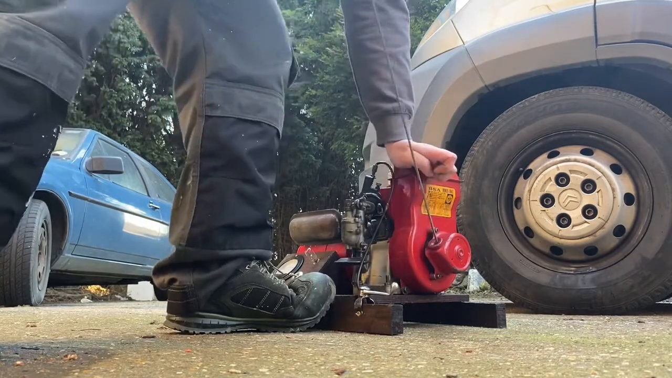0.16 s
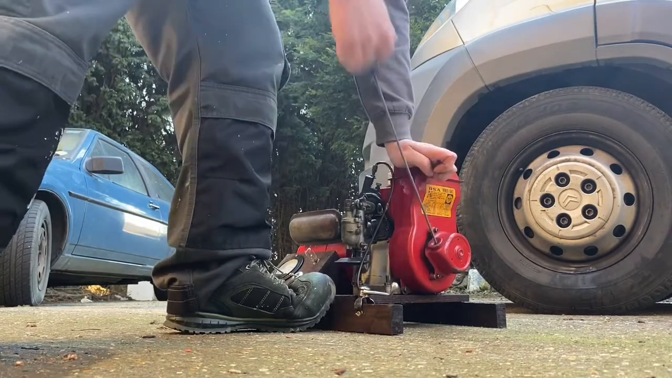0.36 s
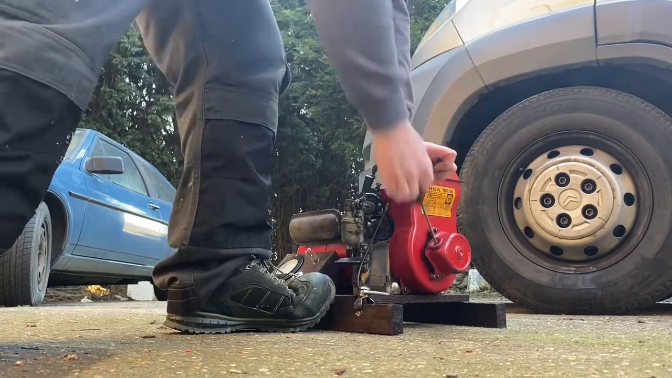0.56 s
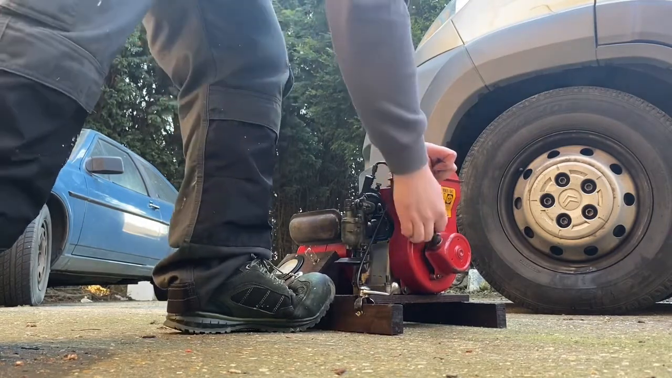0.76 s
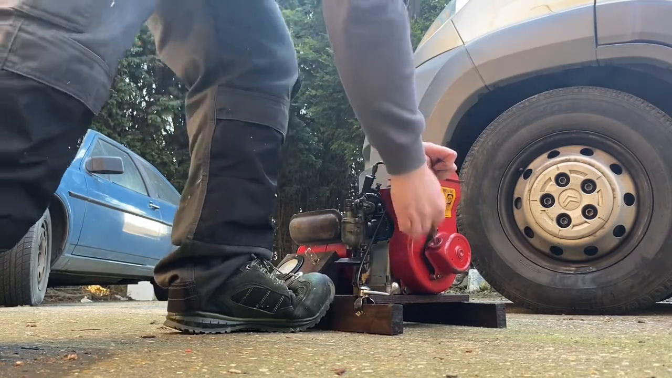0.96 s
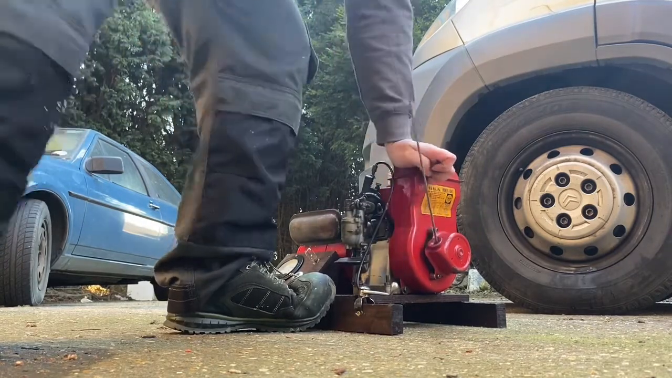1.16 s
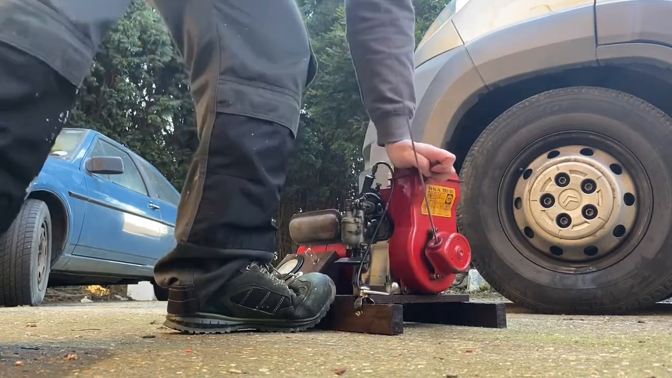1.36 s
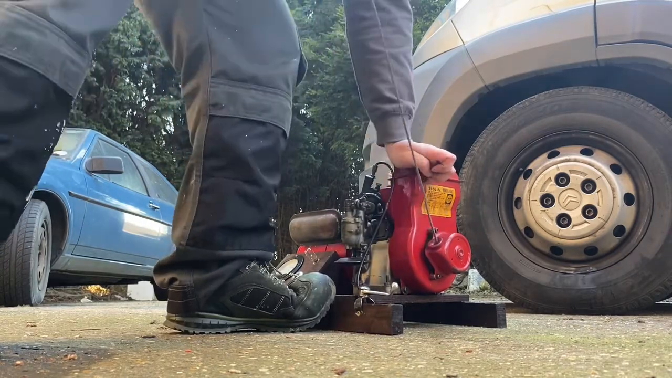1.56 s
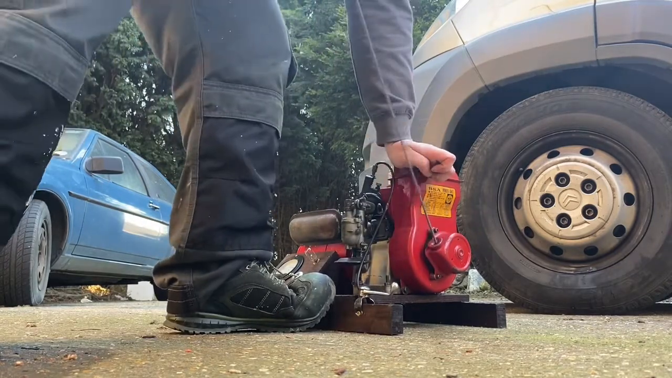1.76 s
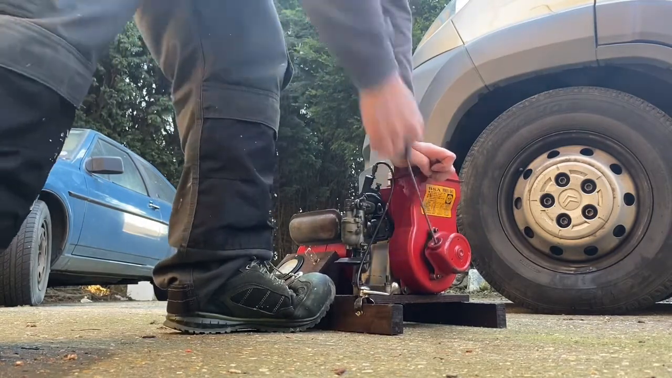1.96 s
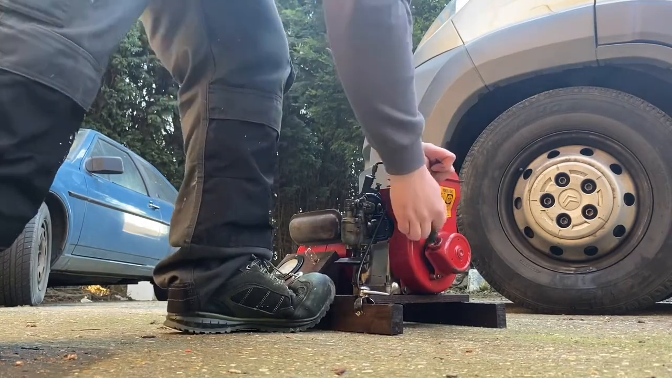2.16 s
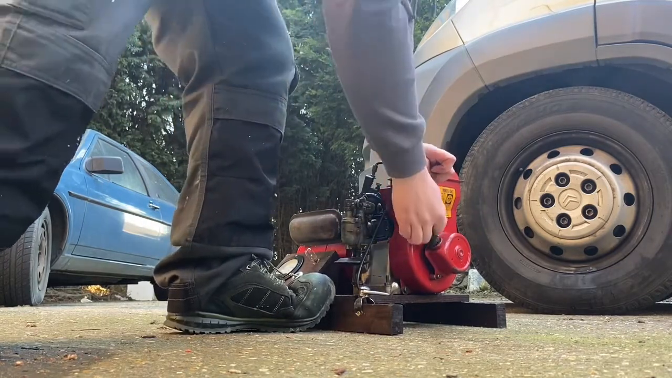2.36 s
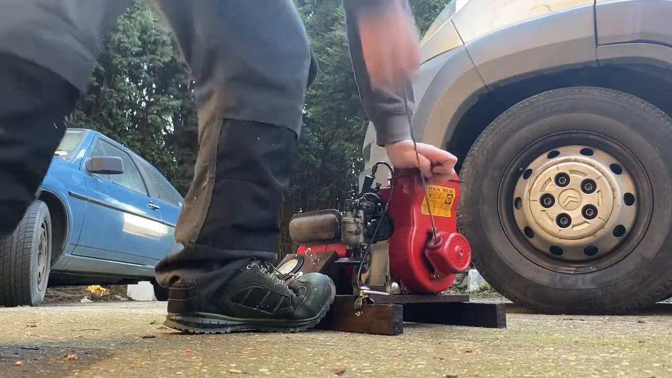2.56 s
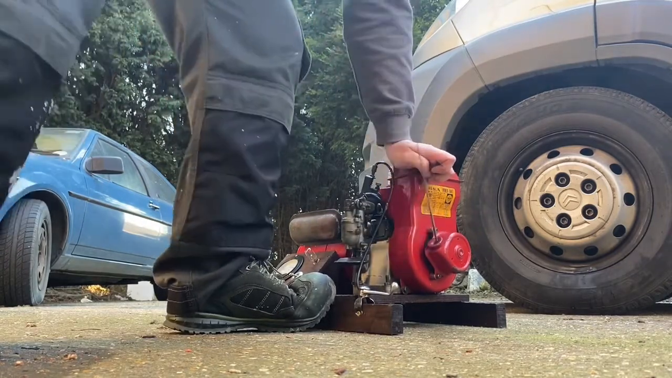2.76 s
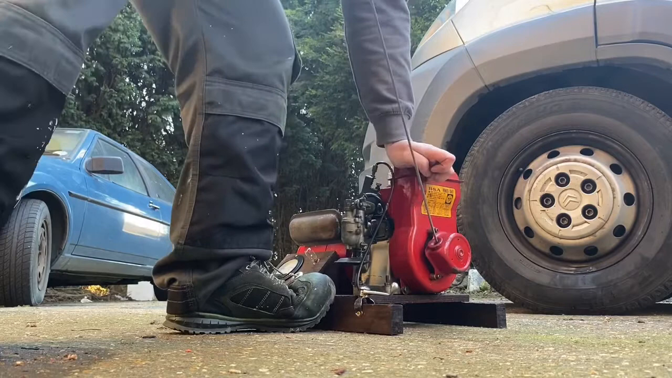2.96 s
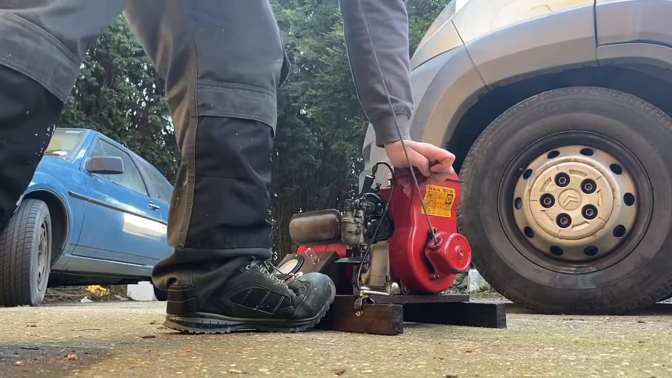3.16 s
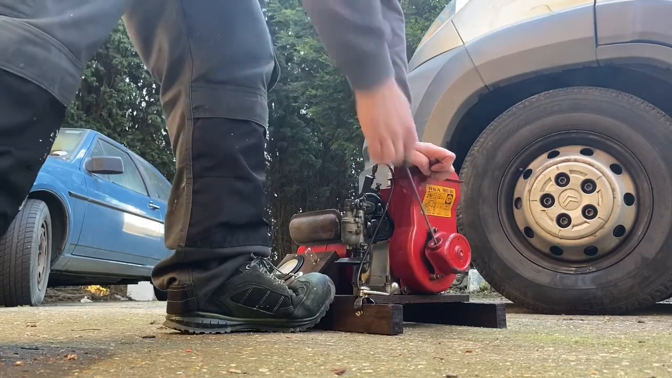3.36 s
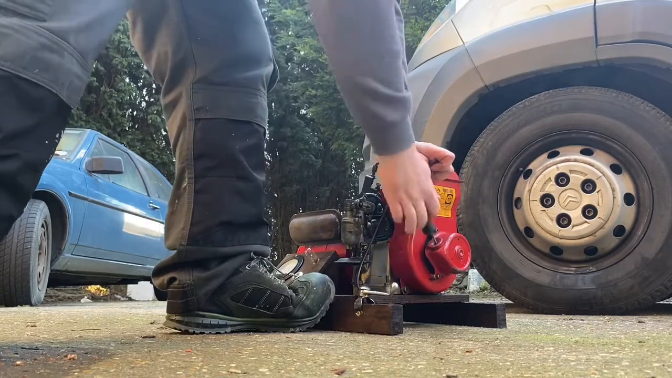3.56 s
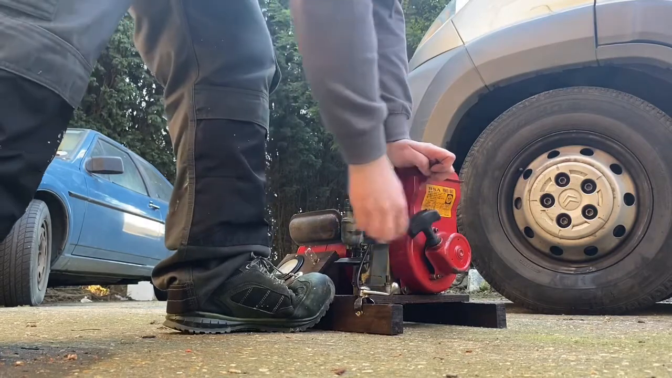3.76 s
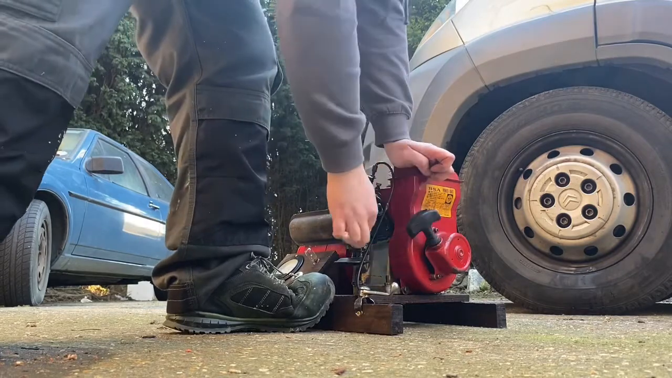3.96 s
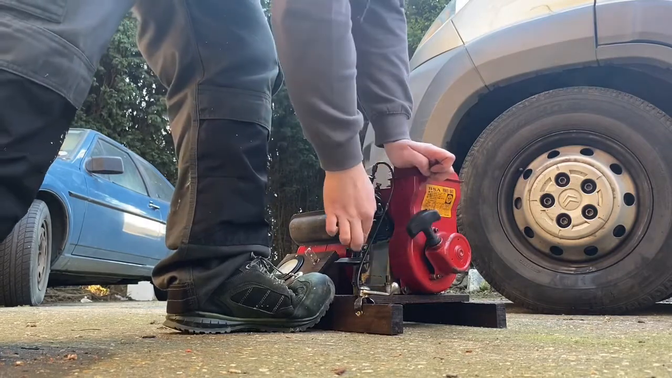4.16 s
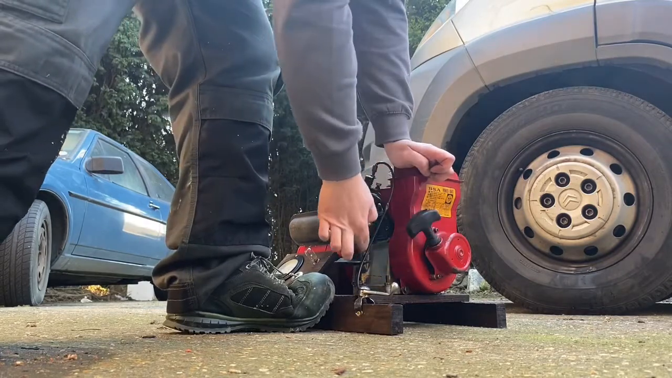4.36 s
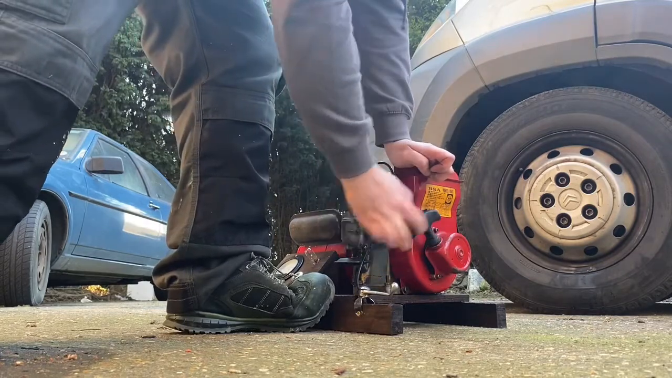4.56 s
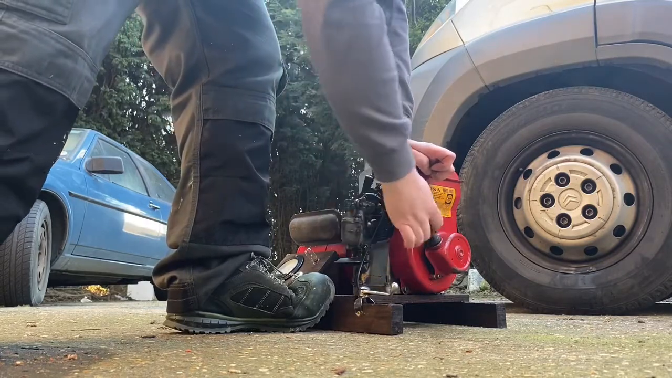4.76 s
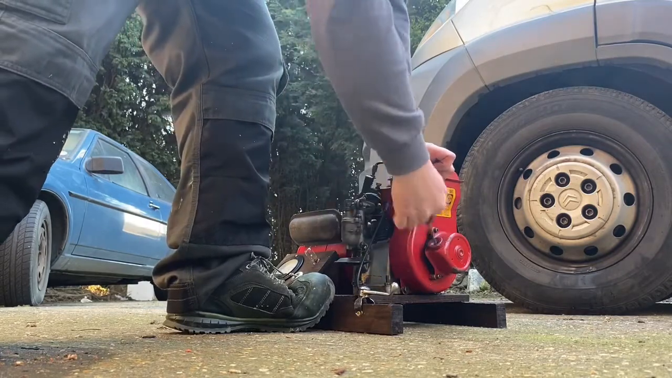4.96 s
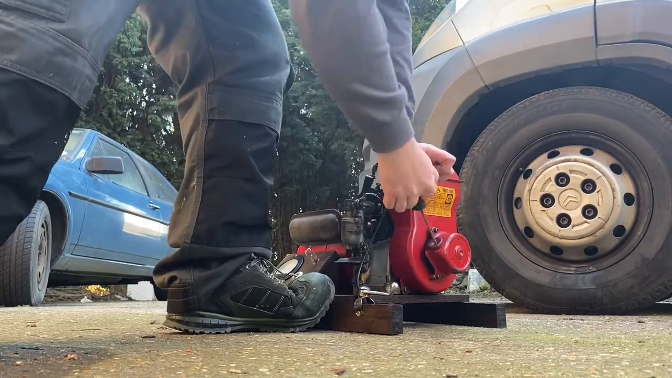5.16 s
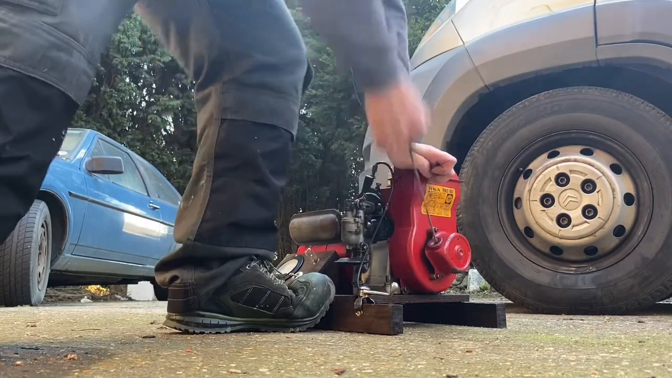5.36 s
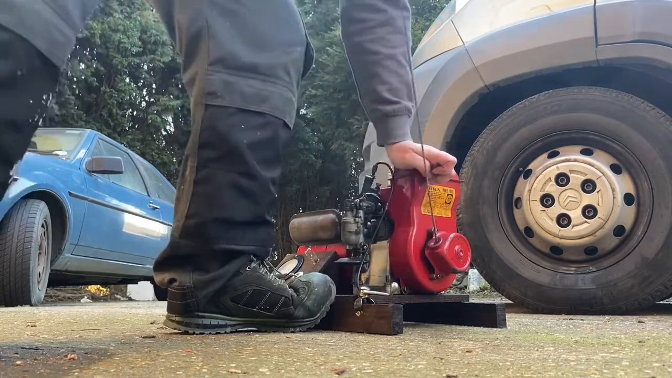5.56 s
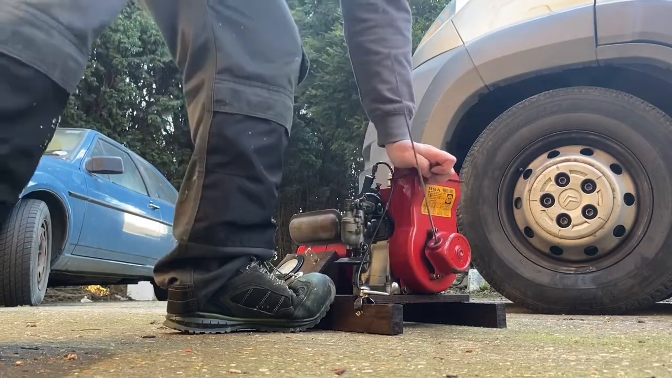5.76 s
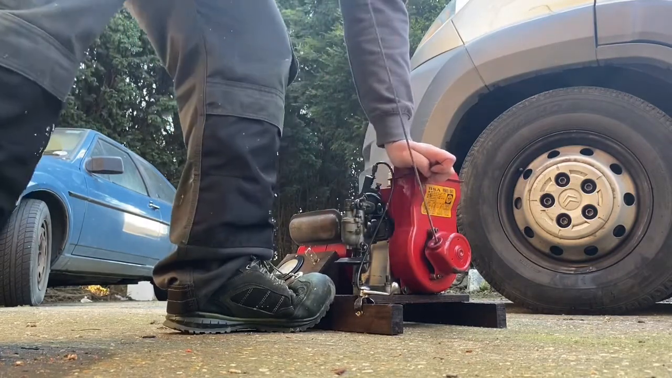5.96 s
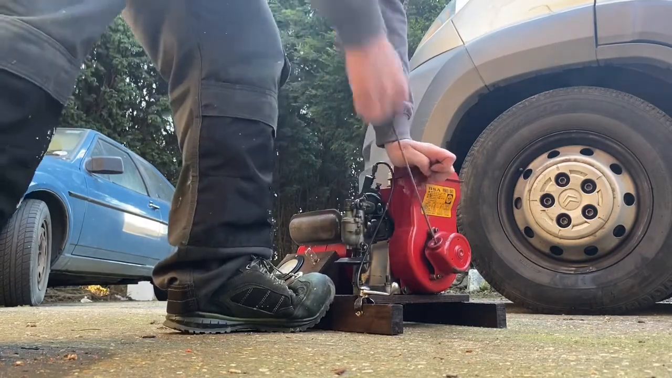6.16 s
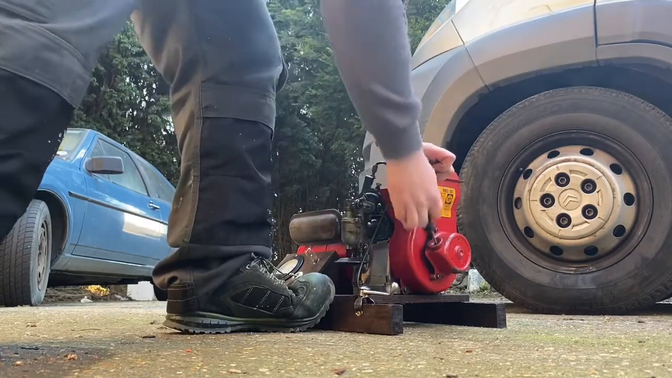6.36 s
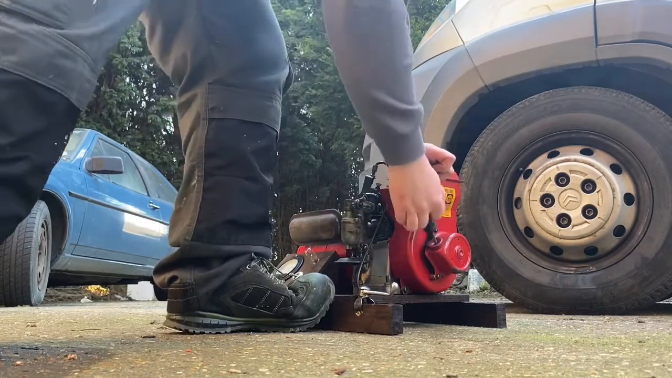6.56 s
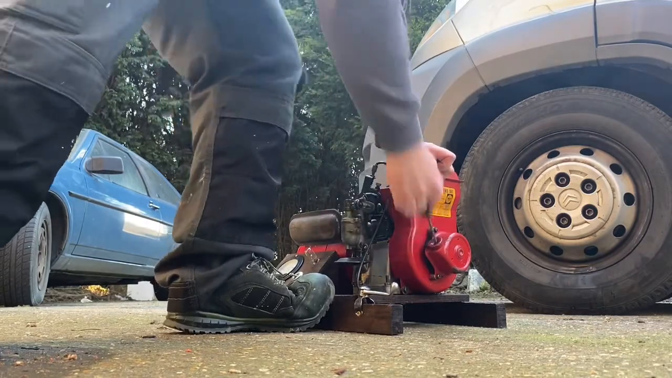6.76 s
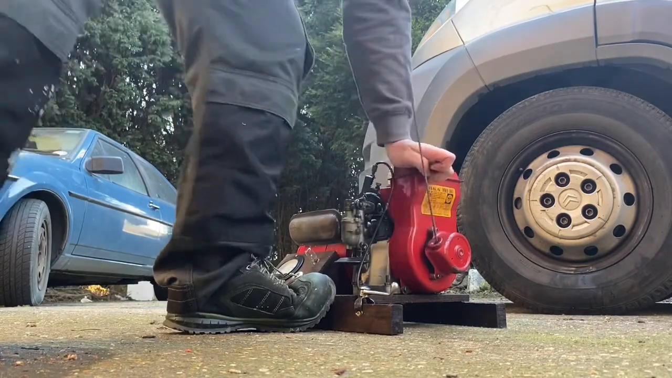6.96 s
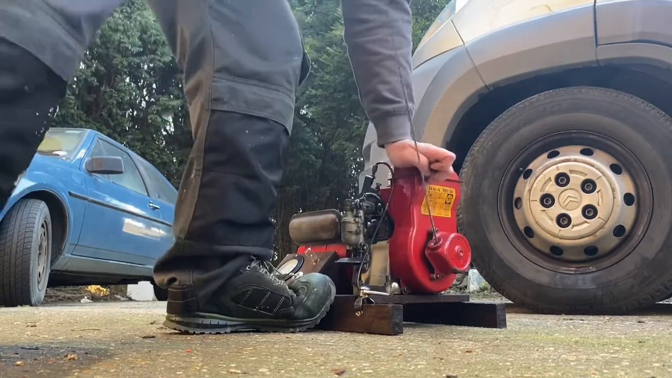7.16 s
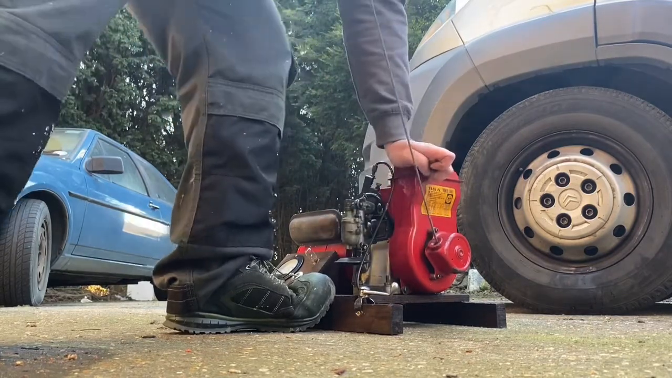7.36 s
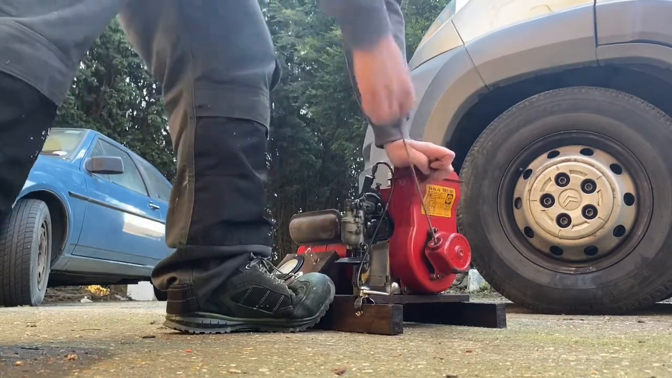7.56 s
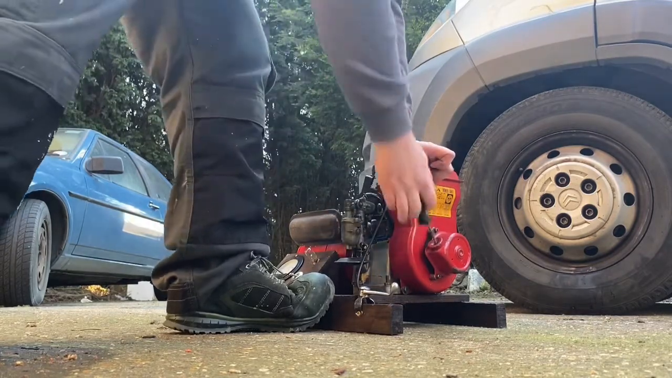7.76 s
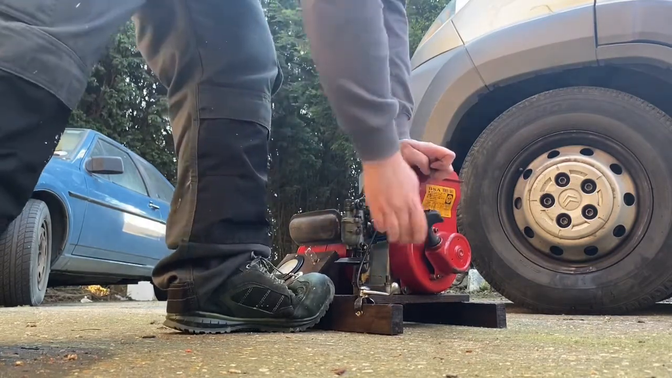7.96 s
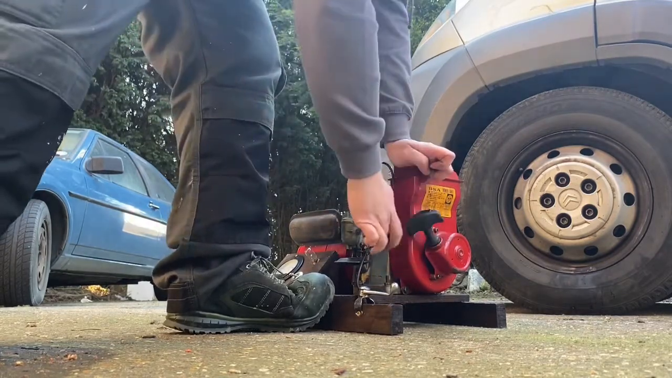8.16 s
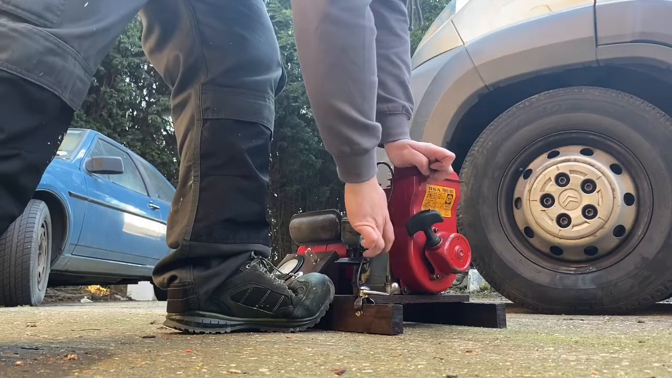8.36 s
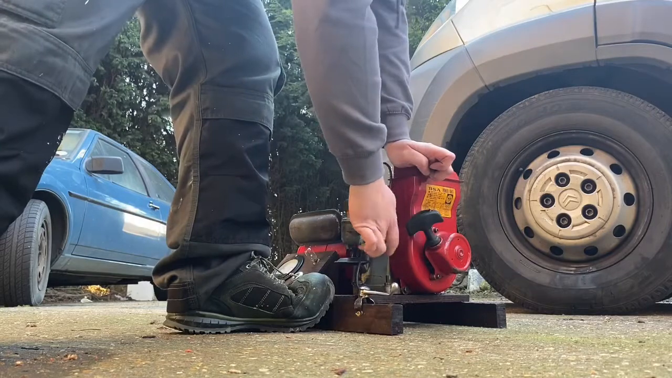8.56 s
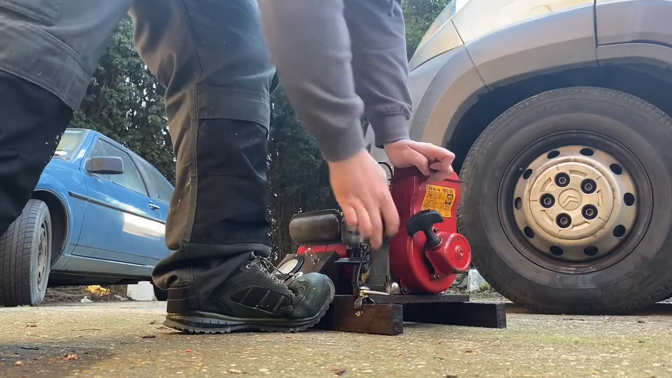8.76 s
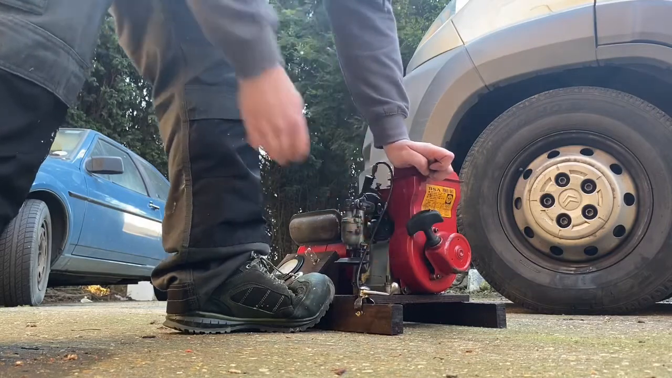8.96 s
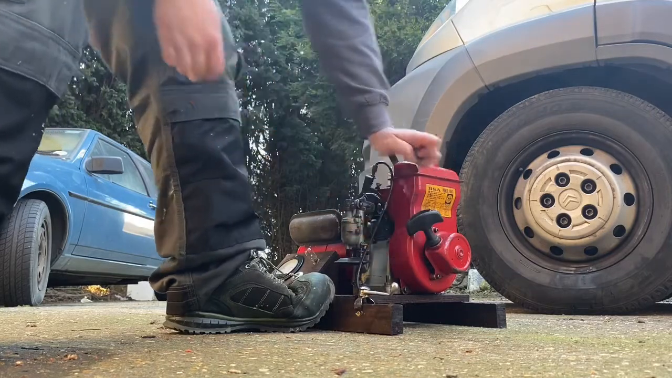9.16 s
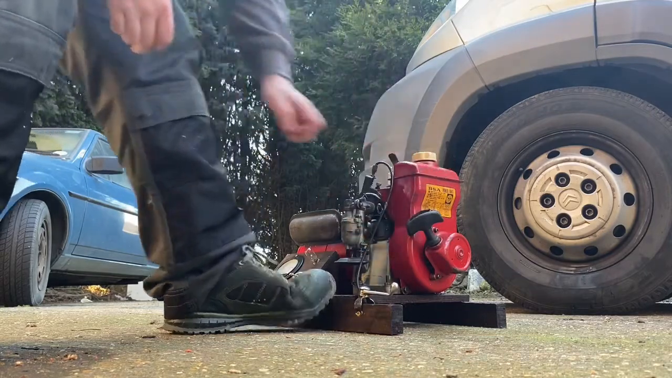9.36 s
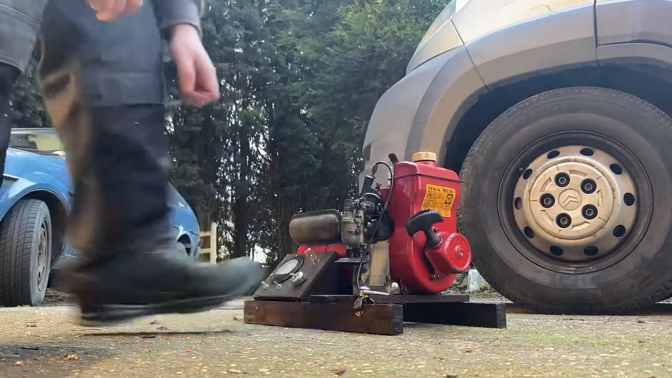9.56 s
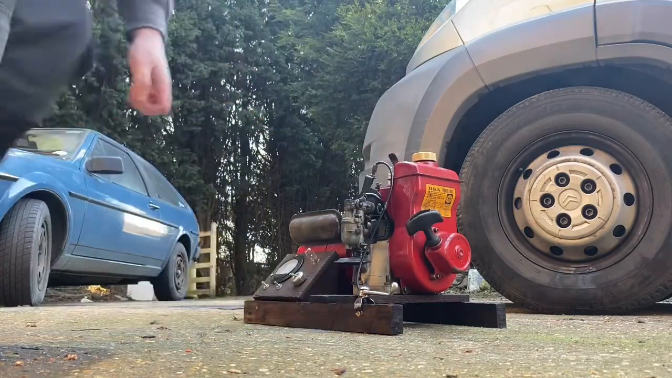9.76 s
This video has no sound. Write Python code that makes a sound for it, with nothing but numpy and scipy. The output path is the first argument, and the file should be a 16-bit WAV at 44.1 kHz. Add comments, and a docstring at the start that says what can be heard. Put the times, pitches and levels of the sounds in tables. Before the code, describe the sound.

A starter cord is yanked again and again on a small engine, ratcheting and chuffing without firing, as a vehicle passes in the distance.

```python
"""First the clatter of a starter cord winding back on a small engine close by, over a low hum of traffic.
Four more pulls follow in a yard by a road; the engine never fires. Pawls and ratchet strike ringing metal,
the turning crank is coloured noise, each chuff a tone of sagging pitch. A vehicle passes in the distance:
random spectra for its wash and rumble, wavering harmonics for its hum."""
import sys
import numpy as np
from scipy import signal
from scipy.fft import rfft, irfft, next_fast_len
from scipy.io import wavfile
from scipy.ndimage import uniform_filter1d

SR = 44100
rng = np.random.default_rng(int(sys.argv[2]) if len(sys.argv) > 2 else 0)


def log_audio(samples):
    """Write samples as a 16-bit WAV file to the path given in sys.argv[1]."""
    # one column per channel
    frames = np.atleast_2d(samples).T
    # limit to full scale, then quantise
    limited = np.clip(frames, -1, 1)
    pcm = np.round(limited * 32767).astype(np.int16)
    wavfile.write(sys.argv[1], SR, pcm)


N = 433062
T = np.arange(N) / SR


def gain_of(db):
    """Decibels to a factor."""
    return 10 ** (np.asarray(db) / 20)


def evened(x):
    """Scales to rms 1."""
    return x / np.sqrt(np.mean(x ** 2) + 1e-20)


def read(points, hz, order=1):
    """A column of a table at given frequencies, on a log axis."""
    table = np.transpose(points)
    return np.interp(np.log(hz + 1), np.log(table[0] + 1), table[order])


def add(mix, s, sound):
    """Mixes a sound in at s seconds."""
    part = mix[max(round(s * SR), 0):][:len(sound)]
    part += sound[:len(part)]


def colour(points):
    """Causal (minimum-phase) impulse response with a given spectrum, energy 1."""
    half = np.log(gain_of(read(points, np.fft.rfftfreq(2048, 1 / SR))))
    log_gain = np.concatenate([half, half[-2:0:-1]])
    phase = -signal.hilbert(log_gain).imag
    taps = np.fft.ifft(np.exp(log_gain + 1j * phase)).real[:1024]
    return taps / np.linalg.norm(taps)


def struck(modes, points, ring_db):
    """Impulse response of a part: its modes over the broad colour of the contact, energy 1."""
    t = np.arange(6000) / SR
    taps = np.zeros(len(t))
    for k, (hz, db, t60) in enumerate(modes):
        # neighbouring modes start in opposition, so the ring swells before it beats
        taps += (-1) ** k * gain_of(db - 60 * t / t60) * np.sin(2 * np.pi * hz * t)
    taps = gain_of(ring_db) * taps / np.linalg.norm(taps)
    add(taps, 0, colour(points))
    return taps / np.linalg.norm(taps)


def ring(drive, taps):
    """Passes a drive through an impulse response."""
    return signal.oaconvolve(drive, taps)[:N]


def grit(per_s, spread_db, hiss, ms):
    """Random small contacts of uneven size, each a short burst, over a smooth rub."""
    sizes = gain_of(spread_db * np.minimum(rng.exponential(1, N), 3))
    ticks = (rng.random(N) < per_s / SR) * sizes
    bursts = signal.lfilter([1], [1, -np.exp(-1000 / (ms * SR))], ticks)
    return evened((evened(bursts) + hiss) * rng.standard_normal(N))


# the cord winding back: (start [s], stop [s], rumble at the start [dB], rasp at the start [dB])
REWINDS = [(0, .56, -34.5, -34), (1.395, 2.04, -37.5, -34), (2.88, 3.29, -31.5, -27),
           (5.76, 6.13, -31, -26.5), (7.194, 7.51, -32.5, -24.5)]
SPOOL_RISE_S, SPOOL_STOP_S, SPOOL_TAIL_S = 0.08, 0.08, 0.33
RUMBLE_DB_PER_S, RASP_DB_PER_S = -22.5, -20.5  # drift while the spool runs
STOP_DB, TAIL_DB = -23.5, -35  # before the start and after the stop; at the end of the tail


def spooling():
    """Rumble and rasp gains: each rewind rises, drifts, stops and trails off."""
    out = np.zeros((2, N))
    for start, stop, *dbs in REWINDS:
        stopped = stop + SPOOL_STOP_S
        s = [start - SPOOL_RISE_S, start, stop, stopped, stopped + SPOOL_TAIL_S]
        for row, drift in enumerate((RUMBLE_DB_PER_S, RASP_DB_PER_S)):
            end = drift * (stop - start)
            course = dbs[row] + np.array([STOP_DB, 0, end, end + STOP_DB, end + TAIL_DB])
            out[row] += gain_of(np.interp(T, s, course, -120, -120))
    return out


# steel starter cup, two close pairs and a faint low mode: (frequency [Hz], level [dB], t60 [s])
CUP = [(3855, -1, .08), (3962, -2, .075), (3760, -1, .022), (4060, -2, .022), (2480, -21, .09)]
# high modes of the cup: (frequency [Hz], level [dB], t60 [s])
CUP_HIGH = [(5200, -8, .025), (5820, -2, .03), (8650, -5, .05), (9400, -2, .02), (10390, 1, .028),
            (11760, -8, .035), (15690, -9, .05)]
# sheet-metal housing: (frequency [Hz], level [dB], t60 [s])
HOUSING = [(426.4, -10, 0.047), (684, -4, 0.0079), (890, 7, 0.02), (1008.6, 0, 0.041), (1168, -2, 0.028),
           (1420, -4, 0.066), (1865, -10, 0.0077), (2473, -25, 0.016)]
# broad colour of contact on the housing: (frequency [Hz], relative level [dB per Hz])
KNOCK = [(120, -38), (250, -17.5), (400, -3), (700, -1), (1100, 4), (1600, -2), (2500, -2), (3600, -26.5)]
# broad colour of contact on the cup: (frequency [Hz], relative level [dB per Hz])
CRACK = [(2500, -25.5), (3400, 0), (4500, -2), (6000, -6), (7500, -13), (9300, 3), (11500, -19.5),
         (13500, -10.5), (15750, -10), (16000, -40)]


def winding():
    """The spool drags round in the housing and keeps the cup faintly singing."""
    rumble, rasp = spooling()
    shared = grit(200, 3.5, 0.57, 11.0)
    housing = ring(rumble * shared, struck(HOUSING, KNOCK, -0.25))
    return housing + ring(rasp * shared, struck(CUP + CUP_HIGH, CRACK, -3.0))


# ratchet clicks as the cord winds back:
# (time [s], cup ring relative level [dB], housing knock before layer gain [dB re cup])
CLICKS = [(0.0118, -17, -9), (0.0453, -8.5, -5.5), (0.0837, -13, -13.5), (0.1233, -17, -0.5),
          (0.157, -13.5, -11.5), (0.1896, -16.5, 1), (0.2446, -15.5, -2.5), (.2880, -17, -5.5),
          (0.3407, -17, -14.5), (0.3768, -16, -6.5), (0.4189, -17, -2.5), (0.4712, -25, -3.5),
          (0.5171, -23.5, -2), (.5435, -25, -4), (.578, -26.5, 0.5), (.6364, -38.5, 3), (1.3883, -15, -3.5),
          (1.4239, -17.5, -10), (1.461, -15.5, -4.5), (1.4956, -15.5, -6.5), (1.536, -18, -4),
          (1.5906, -17.5, -4), (1.6186, -19, 0.5), (1.6364, -16, -7.5), (1.6526, -17, -4.5),
          (1.6973, -19.5, 1), (1.7304, -15.5, -2.5), (1.7514, -17.5, -4.5), (1.7651, -19, -13),
          (1.8034, -16, -4), (1.8306, -25, 1), (1.8493, -21, -1), (1.8848, -20, -2.5), (1.9303, -20, 0),
          (1.9868, -27.5, 1), (2.0564, -27.5, -0.5), (2.842, -20.5, -6.5), (2.8634, -17.5, -14),
          (2.8832, -24, -2.5), (2.911, -23, 0.5), (2.94, -15.5, -15), (2.963, -18, -4), (2.9875, -12.5, 0),
          (3.0243, -16, -19), (3.0512, -14, -2.5), (3.0882, -16.5, -6.5), (3.1171, -17, -4),
          (3.149, -13.5, 1.5), (3.1699, -16, -5), (3.2103, -23, -7.5), (3.2273, -15, -8),
          (3.253, -17, -0.5), (3.275, -19, -28), (3.298, -24, -0.5), (3.3469, -29.5, -1), (3.3951, -30, -3),
          (5.6993, -26, -19), (5.727, -17.5, -9.5), (5.7621, -12.5, -1), (5.7923, -7, -8), (5.831, -9, 0.5),
          (5.8492, -15.5, -15.5), (5.8793, -22, -11), (5.9028, -10.5, -3), (5.9298, -12.5, -3),
          (5.9484, -12, -8), (5.9679, -28, -3), (5.9834, -19, -4), (5.9999, -14.5, -2), (6.012, -14.5, -3),
          (6.029, -10, -8.5), (6.065, -17.5, -7), (6.0893, -15.5, -18.5), (6.1182, -16, 2),
          (6.1485, -19, -5), (6.1756, -23, -1.5), (6.2138, -26, -3.5), (6.2618, -19, -1),
          (6.348, -27, -0.5), (7.1553, -15, -18), (7.1778, -15.5, -3.5), (7.1945, -22, -16),
          (7.2135, -18, 2), (7.2203, -14, -5.5), (7.2451, -11, -15), (7.2691, -29, -7), (7.3124, -12, -2),
          (7.3357, -16, -4), (7.3593, -10.5, -6.5), (7.384, -11, -7), (7.3927, -23.5, 4.5),
          (7.4092, -15, -4), (7.437, -16, -3.5), (7.4688, -14, -6.5), (7.5047, -16, -4.5),
          (7.5484, -27.5, -14.5), (7.6427, -25.5, -0.5)]
# the pawl drops back after each click
REBOUND_S, REBOUND_SPAN_S, REBOUND_DB, REBOUND_SPREAD_DB = 0.0069, 0.011, -12.5, 5
# treble re the cup before layer gains, its scatter, contact time scale
CLICK_CRACK_DB, CLICK_SPREAD_DB, CLICK_MS = -7.5, 3.5, 3.62


def ratchet():
    """Blows of the ratchet: each click and its rebound, with a chance share of treble."""
    s, db, knock = np.transpose(CLICKS)
    late, weak, *bright = rng.random((len(CLICKS), 4)).T
    s = np.concatenate([s, s + REBOUND_S + REBOUND_SPAN_S * late])
    db = np.concatenate([db, db + REBOUND_DB - REBOUND_SPREAD_DB * weak])
    crack = CLICK_CRACK_DB + CLICK_SPREAD_DB * (2 * np.ravel(bright) - 1)
    return list(zip(s, db, db + np.tile(knock, 2), db + crack, CLICK_MS + 0 * s))


# pawls biting and letting go, handle and hand taps, levels before layer gains:
# (time [s], cup ring [dB], housing knock [dB], treble crack [dB], contact time scale [ms])
KNOCKS = [(0.879, -46, -50.5, -56.5, 36), (0.921, -54, -23.5, -31, 3.9), (0.9271, -40, -7, -13.5, 5.9),
          (1.22, -45, -17.5, -9, 5.2), (1.227, -35, -15, -4.5, 1.6), (2.348, -39, -38, -47, 11.6),
          (2.384, -17, -25.5, -13.5, 2.5), (2.389, -43, -7.5, -13.5, 4.9), (2.676, -47, -22.5, -23, 10),
          (2.682, -40, -18.5, -6, 3.1), (2.693, -14, -30.5, -18, 9.6), (3.552, -55, -18.5, -28.5, 5.1),
          (3.562, -24, -45, -25.5, 2.7), (4.771, -35, -36.5, -44.5, 8.9), (4.787, -41, -21.5, -24, 3.7),
          (4.848, -78, -38, -60, 3.8), (4.894, -70, -53, -54, 2.5), (4.904, -52, -38, -52, 2.8),
          (4.927, -70, -62, -48, 2.7), (4.95, -75, -60, -53, 2.5), (4.959, -84, -50.5, -58, 19),
          (5.103, -80, -45, -61, 2.7), (5.139, -81, -50, -46.5, 3), (5.184, -80, -60, -48, 2.3),
          (5.206, -70, -55, -52, 4), (5.2254, -49, -12.5, -13, 4.06), (5.532, -63, -14, -7.5, 3),
          (5.544, -17, -2.5, -1.5, 1.63), (6.466, -40, -55.5, -62, 2.5), (6.498, -36, -28, -35, 4.7),
          (6.691, -56, -16.5, -37.5, 3.35), (6.766, -70, -17, -49, 2), (6.994, -45, -32.5, -14, 1.9),
          (6.999, -30, -9.5, -5, 2.5), (7.008, -13.5, -21.5, -10, 3.4), (7.629, -53, -17.5, -52, 2.4),
          (7.703, -35.5, -50, -40, 2.5), (7.819, -20, -21.5, -25.5, 6.6), (9.026, -89, -57, -56.5, 4),
          (9.422, -90.5, -45.5, -65, 5)]


def blow_forces():
    """Drives for cup halves, housing and treble: each blow strikes the cup and bounces once, then chatters."""
    force, t = np.zeros((4, N)), np.arange(2500) / SR
    hits = ratchet() + KNOCKS
    chances = rng.random((len(hits), 3))
    for (s, cup_db, knock_db, crack_db, ms), (spot, late, bounce) in zip(hits, chances):
        u = t * 1000 / max(ms, .3)  # time in contact times
        # where the pawl lands shares the blow between the modes of each pair
        shares = np.cos(0.35 + 0.8 * spot), np.sin(0.3 + 0.8 * spot)
        for row, share in enumerate(shares):
            impulse = gain_of([cup_db]) * share
            add(force[row], s, impulse)
            add(force[1 - row], s + 0.000956 + 0.0057 * late, impulse * 0.7 * bounce)
        knock = (1 - np.exp(-t / 0.0047)) * np.exp(-u / 1.135)
        crack = (1 - np.exp(-t / 0.00096)) * (np.exp(-u) + 0.21 * np.exp(-u / 1.7))
        add(force[2], s, gain_of(knock_db) * knock)
        add(force[3], s - .0005, gain_of(crack_db) * crack)  # treble at once, housing slower to rise
    return force


# frame under a hard knock: (frequency [Hz], relative level [dB per Hz])
THUD = [(100, -20), (200, 0), (350, 0.5), (600, -10), (1200, -40)]


def blows():
    """Blows ring the cup by impulse and the housing and high modes by chattering noise."""
    force = blow_forces()
    # contacts are uneven: a few strong ticks among many weak ones
    chatter = evened(rng.standard_normal(N) * gain_of(0.3 * rng.exponential(1, N)))
    halves = struck(CUP[::2], CRACK, 10.0), struck(CUP[1::2], CRACK, 12.86)
    cup = sum(ring(f, taps / abs(taps).max()) for f, taps in zip(force, halves))
    knock = ring(force[2] * chatter, struck(HOUSING, KNOCK, 1.7))
    hard = np.maximum(force[2] - gain_of(-23.5), 0)  # only the hardest knocks shake the frame
    thud = ring(hard * chatter, colour(THUD))
    crack = ring(force[3] * chatter, struck(CUP_HIGH, CRACK, -8.0))
    return gain_of(3.5) * cup + gain_of(5.0) * knock + gain_of(-5.0) * thud + gain_of(3.0) * crack


# the road behind, hum pitch and level before their waver:
# (time [s], tyre wash [dB], low rumble [dB], engine hum pitch [Hz], engine hum level [dB])
ROAD = [(0, -49, -53, 61.5, -60), (2.2, -56.5, -59, 62.43, -71), (3.8, -55.5, -58, 64, -69),
        (4.6, -51, -54.5, 64.44, -61.5), (5.6, -45, -53, 63, -51), (6.5, -39, -45.5, 62.3, -47),
        (7.1, -36.5, -45.5, 62.75, -44), (7.7, -36, -48, 59.64, -43), (8.101, -41, -46.5, 61.52, -42),
        (8.5, -45, -47, 57.7, -48.5), (9.098, -48, -48, 58.95, -49.5), (9.82, -51, -48.5, 56.75, -47)]
# colour of the tyre wash: (frequency [Hz], relative level [dB per Hz])
WASH = [(110, -44), (180, -12), (242, -7), (314, -7.5), (522, -5.5), (748, -1), (3430, -30), (7400, -46),
        (9000, -59.5), (11700, -95), (19800, -120)]
# colour of the low rumble: (frequency [Hz], relative level [dB per Hz])
RUMBLE = [(12, -44.5), (20, -7), (43, -3.5), (67, -0.5), (133, -9), (172, -13), (226, -18.5), (300, -16.5),
          (390, -43.5), (660, -120)]
# left-right likeness of the road: (frequency [Hz], correlation [-1 to 1])
SAME = [(60, 0.98), (380, -0.25), (2380, 0.27), (15000, -0.58)]


def road_noise(points):
    """Stereo noise as random short-time spectra, with patches that swell and thin; rms 1."""
    frames, hz = N // 512 + 5, np.fft.rfftfreq(2048, 1 / SR)
    a, b, c, d, patches = rng.standard_normal((frames, 1025, 5), np.float32).T
    patches = evened(uniform_filter1d(uniform_filter1d(patches, 20, 0), 8, 1))
    same = np.clip(read(SAME, hz), -1, 1)[:, None]
    left = a + 1j * b
    right = same * left + np.sqrt(1 - same ** 2) * (c + 1j * d)
    z = np.array([left, right]) * gain_of(read(points, hz)[:, None] + 1.3 * patches)
    return evened(signal.istft(z, nperseg=2048, noverlap=1536)[1][:, :N])


def traffic():
    """Distant tyre wash and rumble under changing levels; a wavering engine hum of three harmonics."""
    s, wash_db, rumble_db, hum_hz, hum_db = np.transpose(ROAD)
    out = np.zeros((2, N))
    for points, db in ((WASH, wash_db), (RUMBLE, rumble_db)):
        out += gain_of(np.interp(T, s, db)) * road_noise(points)
    rates_hz = np.geomspace(.7, 9, 16)
    waver = evened(sum(np.sin(2 * np.pi * (f * T + rng.random())) / np.sqrt(f) for f in rates_hz))
    turn = 2 * np.pi * np.cumsum(np.interp(T, s, hum_hz) * (1 + .012 * waver)) / SR
    hum = np.sin(turn) + gain_of(-9) * np.sin(2 * turn) + gain_of(-13.5) * np.sin(4 * turn)
    return out + gain_of(np.interp(T, s, hum_db) + 2.0 * waver[::-1]) * evened(hum)


# pulls of the cord: (time the pawls let go [s], added strength [dB])
PULLS = [(-.377, 3), (1.2239, 0), (2.675, -0.5), (5.524, 0), (6.979, 0.5)]
# every pull, the crank driven, let go, then coasting, before pull strength:
# (time from letting go [s], rumble [dB], rasp [dB])
CRANKING = [(-.3, -44, -46), (-.25, -43.5, -51), (-.18, -27.5, -36), (-.1, -27.5, -34.5), (-.015, -24, -29),
            (.04, -34.5, -46.5), (.08, -42, -54.5), (0.126, -33.5, -38), (.22, -40, -49.5),
            (.46, -55.5, -72)]


def cranking():
    """Rumble and rasp gains: the same course for every pull."""
    s, low, high = np.transpose(CRANKING)
    out = np.zeros((2, N))
    for at, more_db in PULLS:
        out += gain_of([np.interp(T - at, s, db + more_db, -120, -120) for db in (low, high)])
    return out


# compression chuffs of every pull, wider apart as the crank slows, levels before pull strength and trims:
# (time from letting go [s], chuff [dB], first gulp later by [s], second gulp later by [s], gulps [dB])
STROKES = [(-.178, -27.5, .022, .053, -30), (-.081, -25, .015, .041, -28), (.003, -26.5, .013, .044, -35),
           (.093, -35, .026, .053, -36), (.21, -31.5, .03, .075, -43), (.395, -36.5, .04, .09, -51.5)]
JOLT, JOLT_S, BETWEEN = 0.99, .008, 0.61  # rumble gain added, fading time, gain between jolts


def jolts():
    """Each chuff and gulp after the first pull jolts the block: a gain that jumps and sinks back."""
    out, fading = np.zeros(N), JOLT * np.exp(-np.arange(2000) / SR / JOLT_S)
    for at, _ in PULLS[1:]:
        for s, _, first, second, _ in STROKES:
            for late in (0, first, second):
                add(out, at + s + late, fading)
    return BETWEEN + out


# colour of the turning crank: (frequency [Hz], relative level [dB per Hz])
CRANK = [(120, -15), (250, -9.5), (400, -1.5), (700, -3.5), (1100, 1.5), (1600, -4), (2200, -4),
         (4500, -31.5)]
# colour of the rasping cord: (frequency [Hz], relative level [dB per Hz])
SCRAPE = [(2000, -27), (2700, 0), (3400, 5), (6000, -4), (7500, -7), (9300, -10), (11500, -12.5),
          (15750, -10.5), (16000, -54.5)]


def turning():
    """Crank and valve gear shake the block while the cord rasps."""
    rumble, rasp = cranking()
    shared = grit(260, 1.2, 1.4, 3.6)
    low = ring(rumble * jolts() * shared, struck(HOUSING, CRANK, -18))
    rub = evened(0.49 * shared + grit(450, 2.5, 0.83, 1.2))
    return low + ring(rasp * rub, colour(SCRAPE))


def puff(low_hz, sag_s):
    """A burst of air: a fast onset, a pitch that sags to low_hz, a decay of about a cycle."""
    t = np.arange(3000) / SR
    hz = low_hz * (1 + 5.1 * np.exp(-t / sag_s))
    swing = -np.sin(2 * np.pi * np.cumsum(hz) / SR)
    return swing * (1 - np.exp(-t / .0009)) * np.exp(-t * low_hz / 1.25)


def chuffs():
    """Unfired air leaves the cylinder: a suck and push, then two lighter gulps of the valves."""
    out = np.zeros(N)
    chuff, gulp_1, gulp_2 = puff(62, .0027), puff(300, .0015), puff(130, .003)
    for at, more_db in PULLS:
        for s, db, first, second, gulp_db in STROKES:
            if at + s <= 0:  # before the start
                continue
            add(out, at + s, gain_of(db + 1.0 + more_db) * chuff)
            add(out, at + s + first, gain_of(gulp_db + more_db) * gulp_1)
            add(out, at + s + second, gain_of(gulp_db + 3 + more_db) * gulp_2)
    return out


# the two microphone ports facing the engine:
# (frequency [Hz], phase by which left leads [rad], left minus right level [dB])
PORTS = [(20, 0, .8), (350, .3, -.6), (700, 0, 3.5), (1300, -.9, 1.5), (2400, -.1, -.6), (3500, .6, -1.2),
         (4800, .2, .6), (5850, -.8, 2.5), (7000, -.2, 0), (8300, -2.5, .2), (9600, -3.8, 0),
         (11300, -6.3, -.3), (12500, -8.9, 0), (13600, -9.6, 0), (15100, -12.5, 0)]


def ports(x):
    """The engine reaches the two ports with a phase and level difference that depend on pitch."""
    size = next_fast_len(N + 4096)
    hz = np.fft.rfftfreq(size, 1 / SR)
    tilt = gain_of(read(PORTS, hz, order=2) / 2) * np.exp(.5j * read(PORTS, hz))
    return irfft(rfft(x, size) * np.array([tilt, 1 / tilt]), size)[:, :N]


# dying away of the yard: (frequency [Hz], t60 [s])
YARD = [(300, 0.39), (3000, 0.17), (12000, 0.11)]


def yard(x):
    """Sparse echoes off ground and parked vehicles, each band dying at its own speed."""
    taps = np.zeros((2, SR // 2))
    at = np.arange(150, SR // 2 - 20, 20)
    at = at + rng.integers(0, 20, (2, len(at)))  # one echo at a chance spot in every 20 samples
    np.put_along_axis(taps, at, rng.choice([-1., 1.], at.shape), 1)
    hz, t, z = signal.stft(taps, SR, nperseg=256)
    tail = signal.istft(z * gain_of(-60 * t / read(YARD, hz)[:, None]), SR, nperseg=256)[1]
    return signal.oaconvolve(x[None], tail / np.linalg.norm(tail[0]), axes=1)[:, :N]


def scene():
    """Engine close by, its echoes, and the road behind."""
    no_bass = signal.butter(2, 170, "high", fs=SR, output="sos")  # small parts radiate no bass
    metal = signal.sosfilt(no_bass, blows() + turning() + winding())
    # the engine sounds hollow near 3 kHz
    metal = metal - 0.5 * signal.lfilter(*signal.iirpeak(2980, 6.5, SR), metal)
    return ports(metal + chuffs()) + gain_of(-12) * yard(metal) + traffic()


def record(dry):
    """The microphone loses the deepest bass and rounds off the highest peaks; then the band limit."""
    no_deep_bass = signal.butter(2, 38, "high", fs=SR, output="sos")
    heard = np.tanh(signal.sosfilt(no_deep_bass, dry))
    band_limit = signal.firwin(511, 16990, window=("kaiser", 9), fs=SR)  # edge in Hz
    return signal.oaconvolve(heard, band_limit[None], "same")


dry = scene()
out = record(dry)
log_audio(out)
```